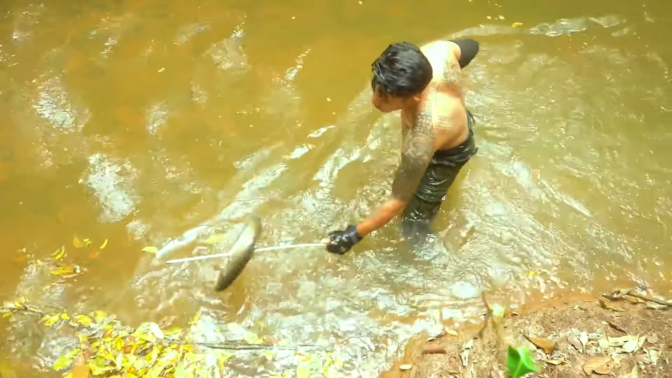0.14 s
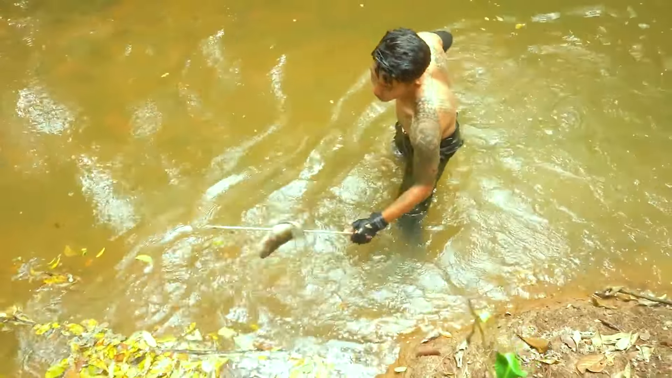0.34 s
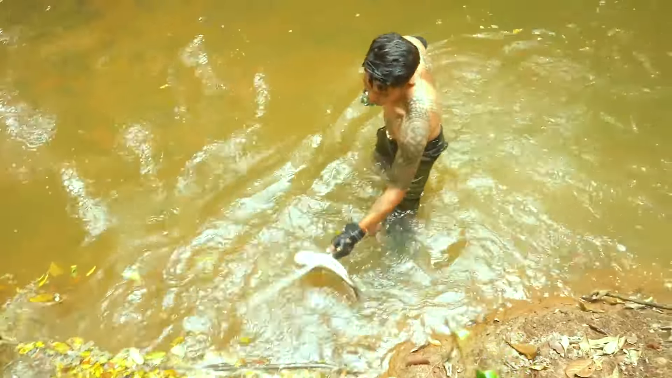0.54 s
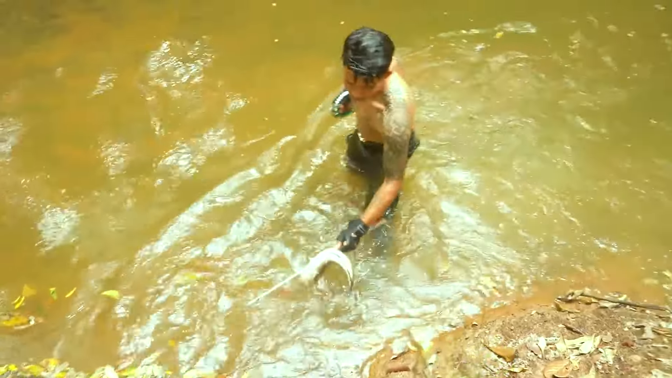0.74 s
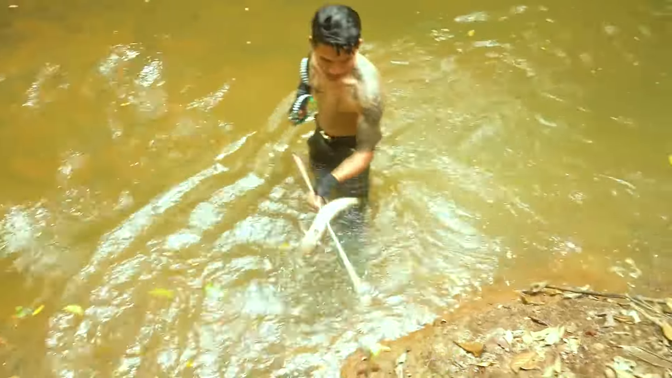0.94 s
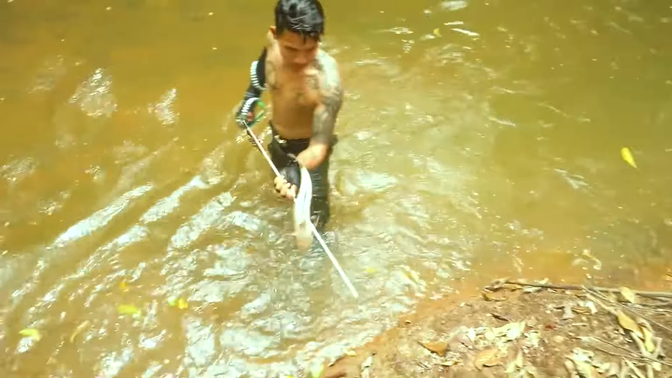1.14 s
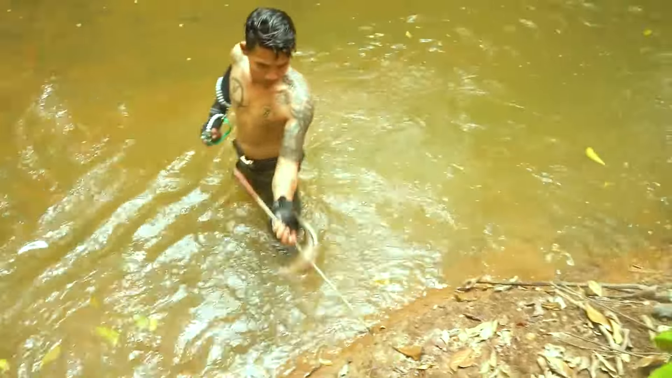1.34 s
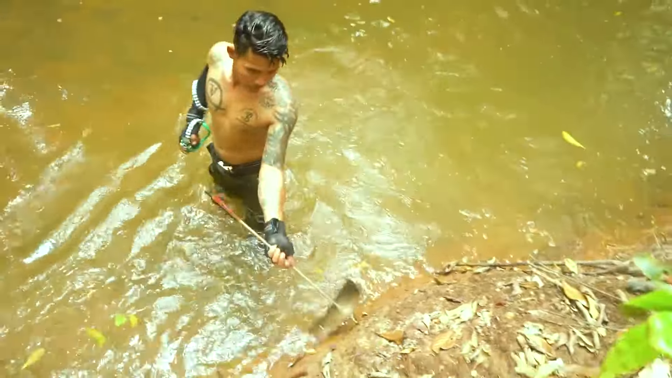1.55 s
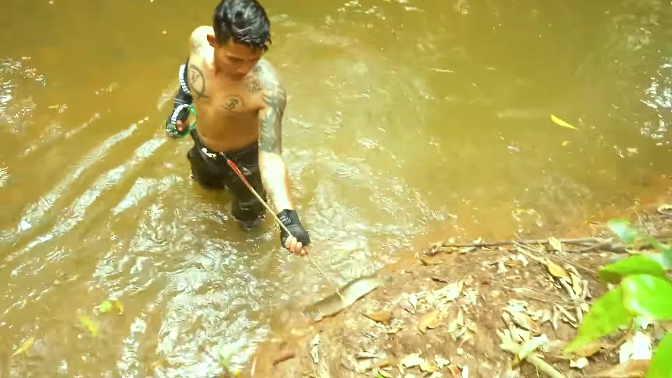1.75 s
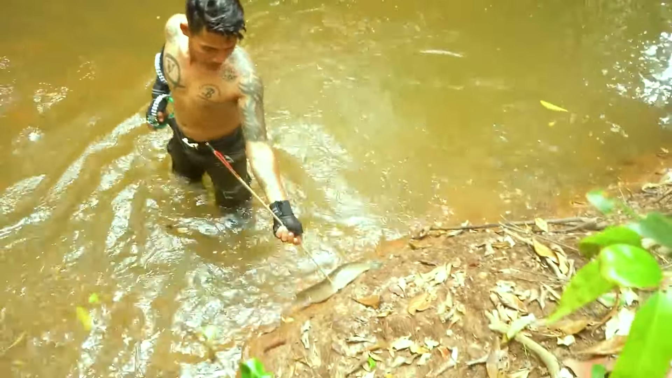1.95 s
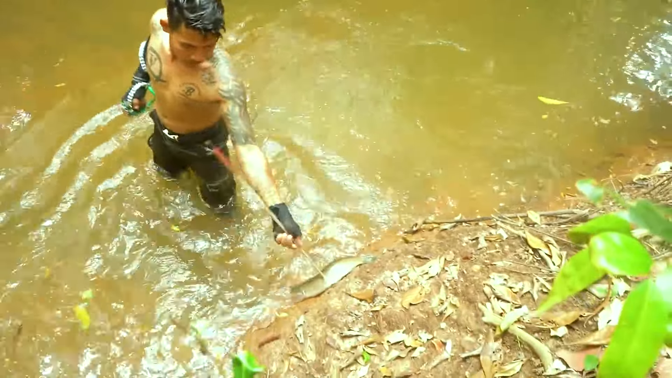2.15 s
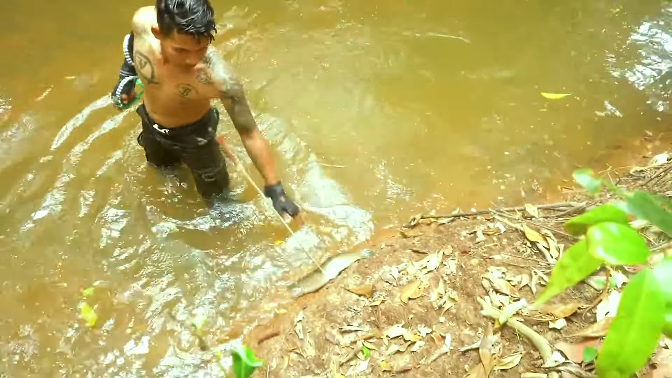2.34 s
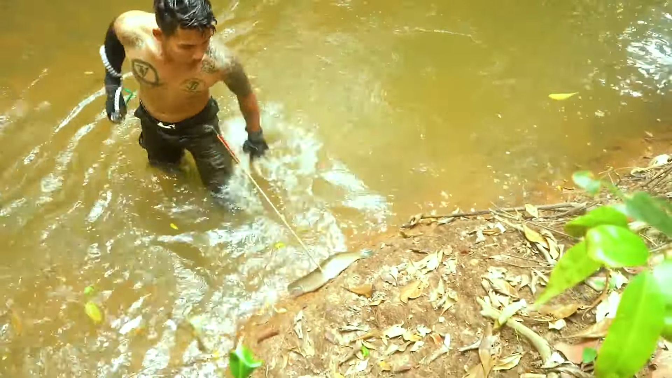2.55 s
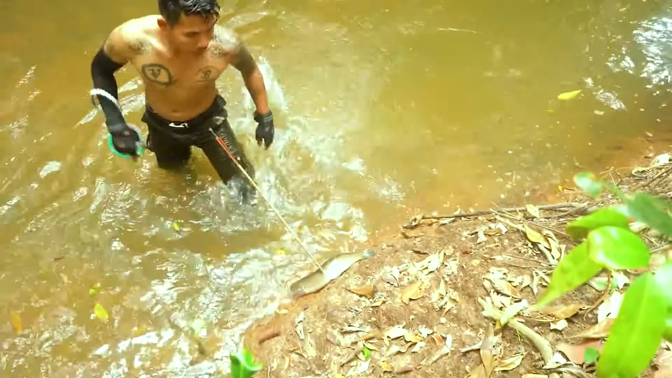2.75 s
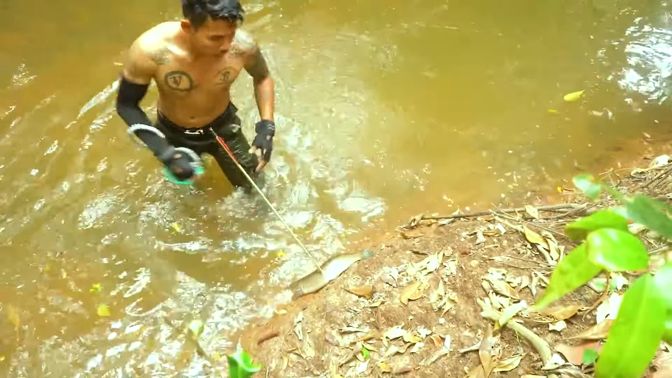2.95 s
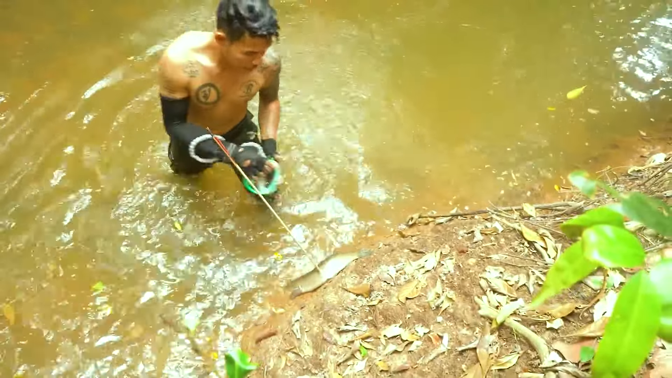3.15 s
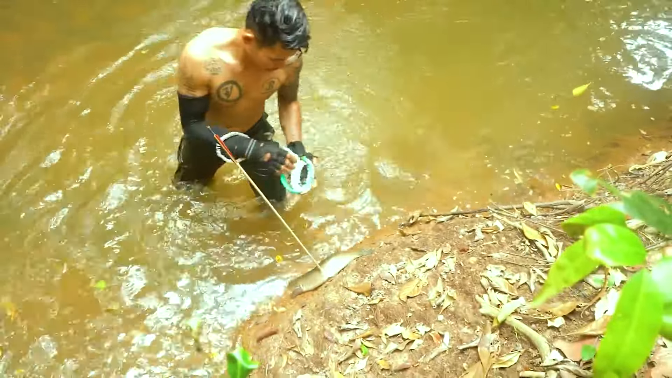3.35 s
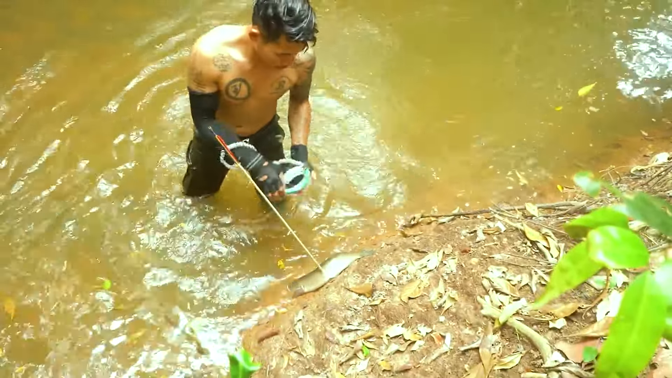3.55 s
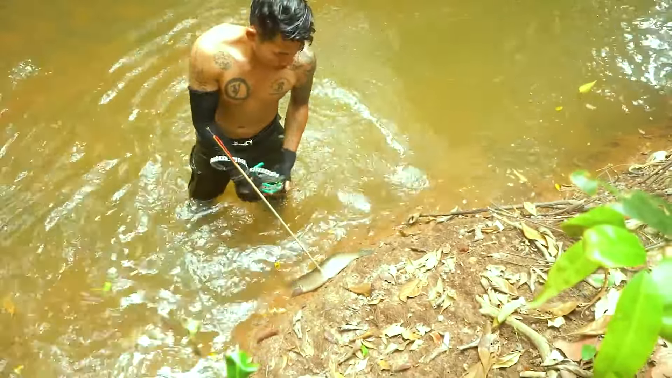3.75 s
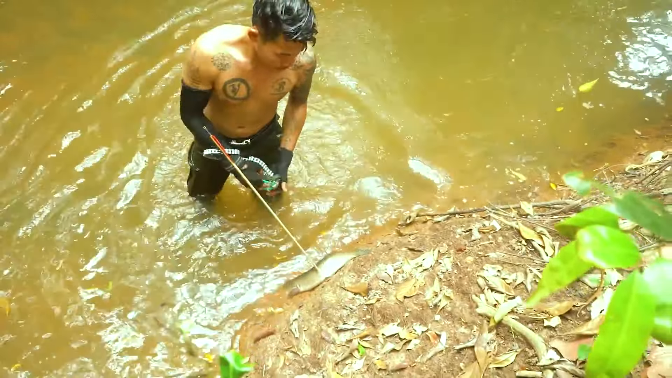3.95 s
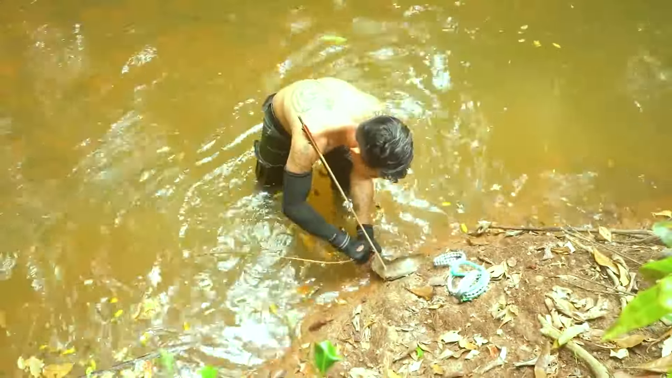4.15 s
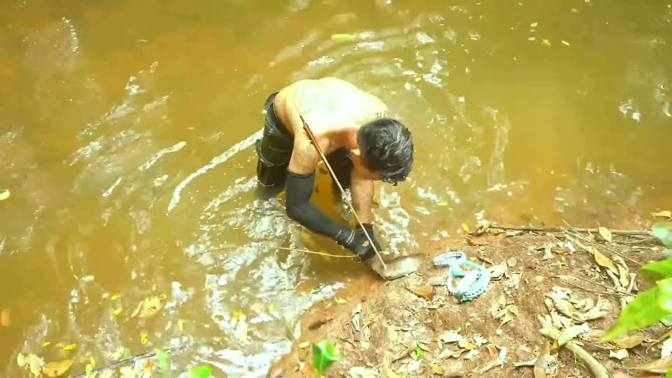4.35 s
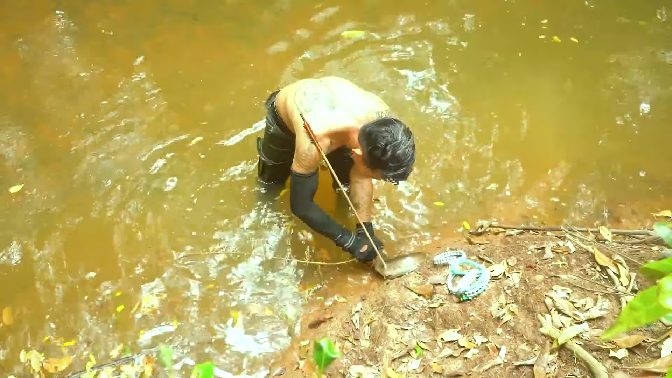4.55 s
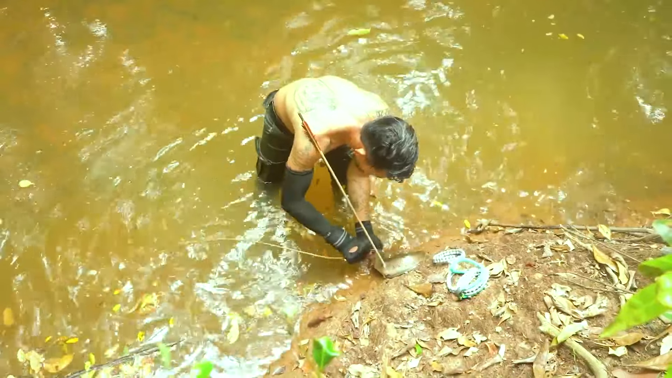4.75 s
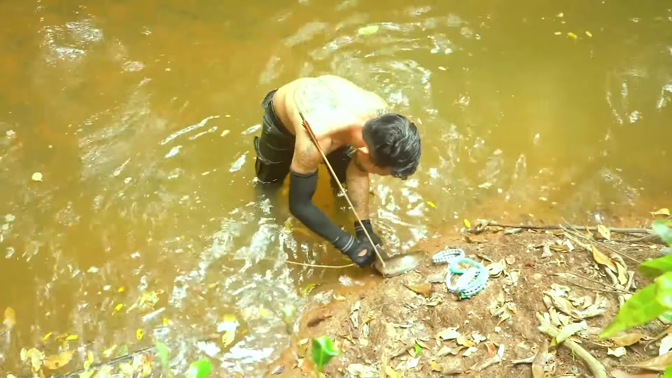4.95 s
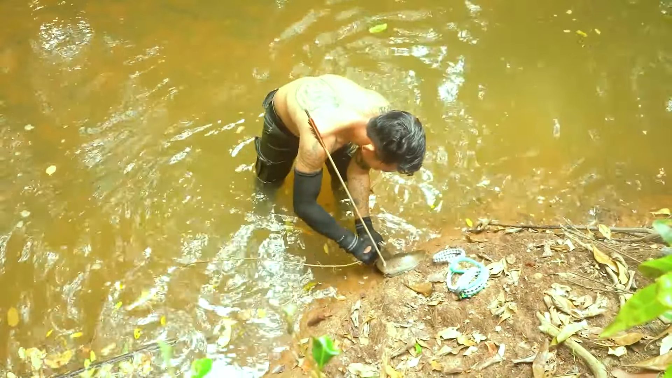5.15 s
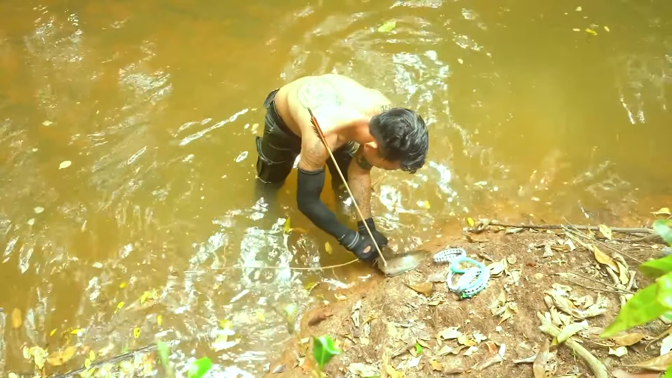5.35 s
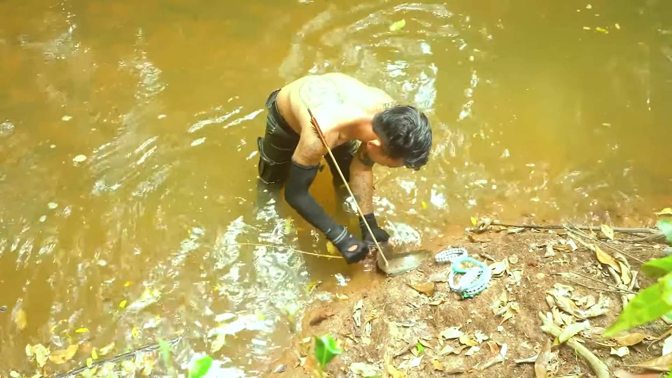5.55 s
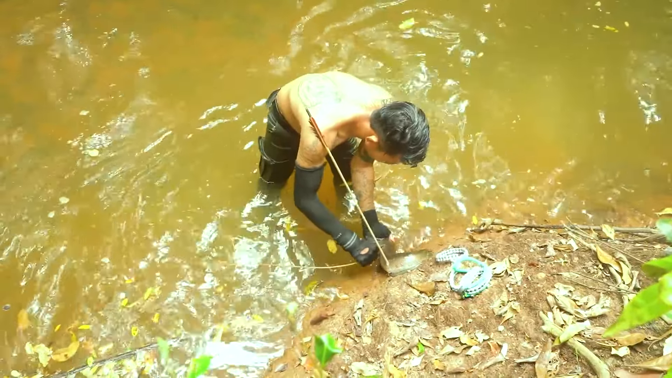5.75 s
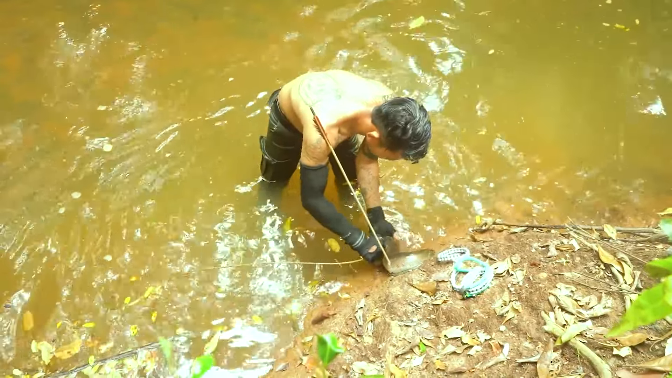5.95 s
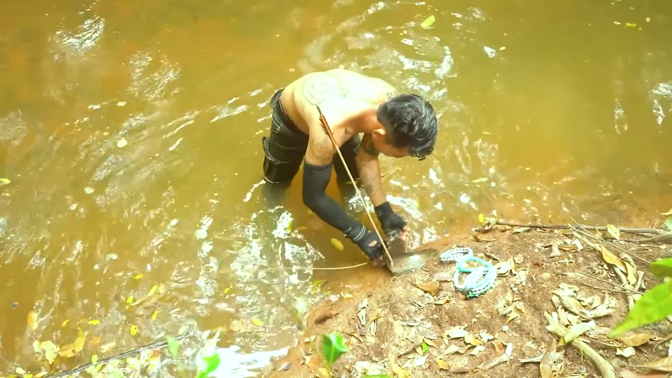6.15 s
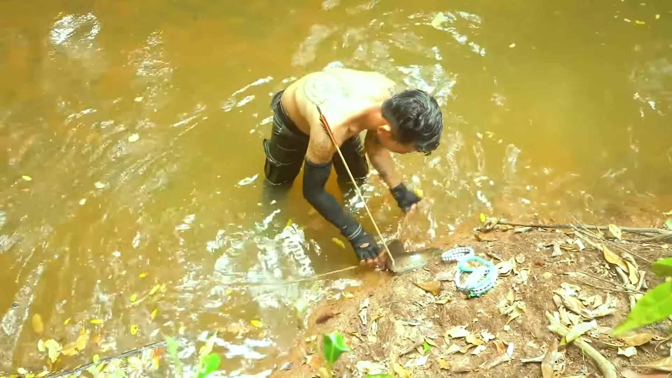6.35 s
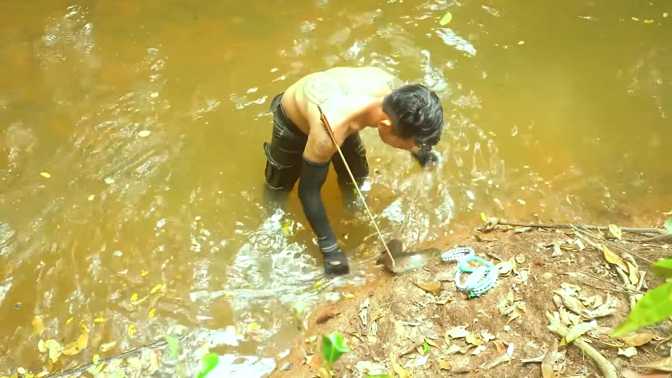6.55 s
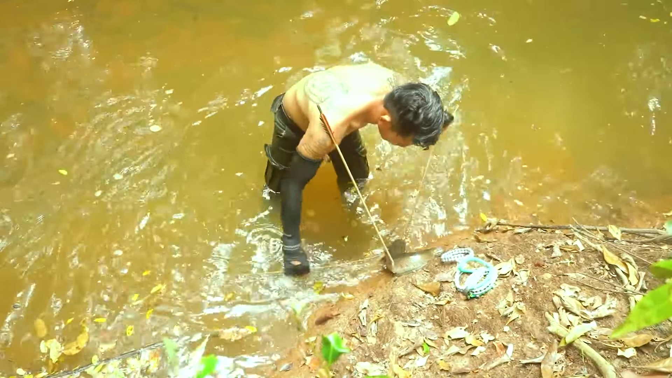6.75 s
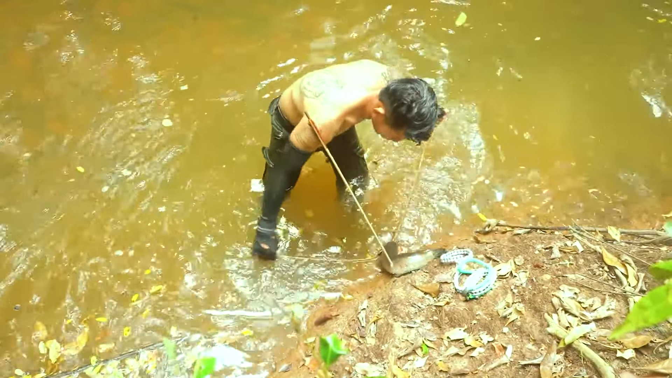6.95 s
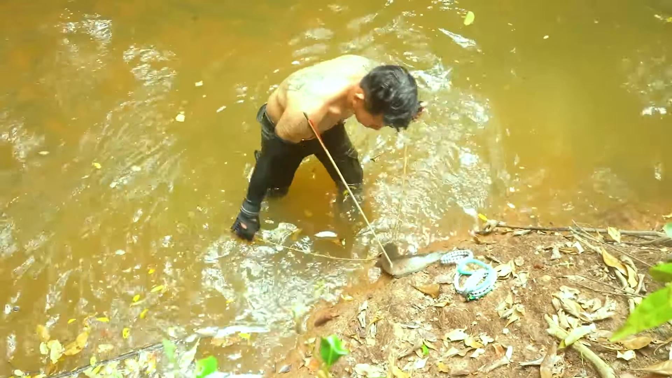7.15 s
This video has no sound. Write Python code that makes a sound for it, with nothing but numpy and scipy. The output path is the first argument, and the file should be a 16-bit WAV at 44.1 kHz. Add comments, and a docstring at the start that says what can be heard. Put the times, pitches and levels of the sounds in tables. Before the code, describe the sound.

Water churns and slaps around wading legs, settles to drips and soft forest hum with birds chirping, then scraping and fresh splashes return.

```python
"""A shallow forest stream with someone wading close by. Churned water is swarms of ringing bubbles under a rush
of hiss; single bubbles, slaps, thuds and gulps stand out of it. The forest hums as shaped noise, two birds are
wavering sines, and a thin rod scraped along the bank is random slips ringing moving resonances. Sound reaches
two microphone ports with small lags, and echoes follow the near sounds and the birds. The background is fuller
above the bass until 4.09 s, then steps down at once."""
import sys
import numpy as np
from scipy import signal
from scipy.fft import rfft, irfft, next_fast_len
from scipy.io import wavfile
from scipy.ndimage import uniform_filter1d

SR = 44100
rng = np.random.default_rng(int(sys.argv[2]) if len(sys.argv) > 2 else 0)


def put_to_file(sound):
    """Save the sound as 16-bit audio at rate SR, in the file named by the first command-line argument."""
    columns = np.atleast_2d(sound).T  # one column per channel
    safe = np.clip(columns, -1, 1)
    whole_steps = np.round(safe * 32767)
    wavfile.write(sys.argv[1], SR, whole_steps.astype(np.int16))


N = 317961  # samples
FFT_SIZE = next_fast_len(N + 8192)
FULLER_UNTIL_S = 4.09  # the background is fuller above the bass until here, then steps down at once


def amp(db):
    """Level to amplitude: 20 dB is a factor of ten."""
    return 10 ** (np.asarray(db) / 20)


def evened(x):
    """Normalization to a root-mean-square value of one."""
    return x / np.sqrt(np.mean(x ** 2) + 1e-20)


def read(points, hz):
    """Spectral interpolation: straight lines on a log-frequency axis."""
    f, value = np.transpose(points)
    return np.interp(np.log(hz + 1), np.log(f + 1), value)


def along(rows, t):
    """Linear interpolation in time of each column after the first."""
    s, *columns = np.transpose(rows)
    return [np.interp(t, s, column) for column in columns]


def add(mix, s, sound):
    """Superposition: a sound is summed into the mix from s seconds on."""
    part = mix[round(s * SR):][:len(sound)]
    part += sound[:len(part)]


def wander(length, size):
    """Random fluctuation: white noise smoothed by a running mean of size samples."""
    return evened(uniform_filter1d(rng.standard_normal(length), size=size))


def clicks(per_s, spread_db):
    """Random impulse train: independent arrivals, many small and a few large."""
    strength = amp(spread_db * np.minimum(rng.exponential(1, N), 5))
    return strength * (rng.random(N) < per_s / SR)


def bandpass(order, edges, x):
    """Band-pass filtering between two edges in Hz."""
    return signal.lfilter(*signal.butter(order, edges, "band", fs=SR), x)


def hiss(points, patchy_db, flicker_db, size):
    """Time-varying noise: two unrelated random short-time spectra share patches and flicker."""
    frames, hz = 4 * N // size + 5, np.fft.rfftfreq(size, 1 / SR)
    a, b, c, d, patches = rng.standard_normal((frames, len(hz), 5)).T
    patches = uniform_filter1d(patches, size=8, axis=0)
    patches = evened(uniform_filter1d(patches, size=8, axis=1))
    flicker = wander(frames, 6)
    level_db = read(points, hz)[:, None] + patchy_db * patches + flicker_db * flicker
    return hz, np.array([a + 1j * b, c + 1j * d]) * amp(level_db)


def pair(hz, z, likeness):
    """Partial coherence: two unrelated spectra mix to a left and right alike by the given share."""
    same = np.clip(read(likeness, hz), 0, 1)[:, None]
    return np.array([z[0], same * z[0] + np.sqrt(1 - same ** 2) * z[1]])


def heard(z, size):
    """Inverse short-time transform: overlapping frames add up to sound."""
    return evened(signal.istft(z, nperseg=size, noverlap=3 * size // 4)[1][..., :N])


def ports(x, lag_us):
    """Arrival-time difference: the right port hears the source lag_us microseconds after the left."""
    turn = np.exp(-1j * np.pi * np.fft.rfftfreq(FFT_SIZE, 1 / SR) * lag_us / 1e6)
    return irfft(rfft(x, FFT_SIZE) * [1 / turn, turn], FFT_SIZE)[:, :N]


def scatter(x, t60):
    """Reverberation: dense decaying echoes off banks and trunks, different at each port."""
    t = np.arange(int(t60 * SR)) / SR
    echoes = rng.standard_normal((2, len(t))) * amp(-60 * t / t60) * (t > .003)
    return signal.oaconvolve(x[None], echoes / np.linalg.norm(echoes[0]), axes=1)[:, :N]


def whistle(rows, wobble, flutter_db):
    """Frequency modulation: a sine follows a pitch curve, wavering in pitch and strength."""
    t = np.arange(rows[0][0], rows[-1][0], 1 / SR)
    hz, db = along(rows, t)
    waver, flutter = wander(len(t), 300), wander(len(t), 700)
    tone = np.sin(2 * np.pi * np.cumsum(hz * (1 + wobble * waver)) / SR)
    return t[0], np.sqrt(2) * amp(db + flutter_db * flutter) * tone * signal.windows.tukey(len(t), .25)


def bubble(hz, t60, climb=.05):
    """Volume pulsation: a sine holds, then dies fast as the bubble bursts; pitch climbs near the surface."""
    t = np.arange(int(t60 * SR) + 8) / SR
    decay = amp(-60 * (t / t60) ** 1.496)
    onset = 1 - np.exp(-t * hz * 2.41)
    return decay * onset * np.sin(2 * np.pi * hz * t * (1 + climb * t / t60))


def water_level(t):
    """Power addition: splashes swell and die by straight slopes in dB, over an even floor until 4.09 s."""
    # Splashes and surges. Each row: peak time in seconds, churn level in dB, seconds to rise 20 dB,
    # seconds to fall 20 dB, spray relative to churn in dB before the common spray lift.
    splashes = [(.04, -21, 5.54, 0.38, -9), (0.305, -27, 0.25, 0.2, -6.5), (.425, -30, 0.17, 0.2093, -4.5),
                (.47, -27.5, 0.2, 0.02, -10), (.655, -25, 0.014, 0.2, 1), (0.734, -22, 0.1, 0.0229, 1.5),
                (.775, -28, 0.0881, 0.18, 2.5), (.915, -33.5, 0.13, 0.6553, 1.3),
                (1.09, -35, 0.1, 0.265, -6), (1.694, -28.5, 0.0052, 0.0914, 4),
                (1.77, -33.5, 0.3827, 0.6544, -3.5), (2.076, -30.5, 0.07, 0.17, -8.5),
                (2.528, -27.5, 0.02, 0.3122, 6), (2.63, -23, 0.06, 0.06, -12),
                (2.745, -20, 0.1933, 0.45, -2.5), (2.95, -20.5, 0.32, 0.24, -7),
                (3.05, -30.5, 0.1493, 0.544, -3), (3.213, -27.5, 0.06, 0.32, -13.5),
                (6.26, -43, 0.06, 2.5, 4.5), (6.611, -25.5, 0.3377, 0.25, -11),
                (6.84, -29.5, 0.665, 0.22, -6.5), (6.99, -37.5, 0.21, 0.1, -2)]
    floor_db, floor_spray_db = -49.5, .5
    s, db, rise, fall, spray_db = np.transpose(splashes)[..., None]
    power = amp(db - 20 * np.maximum((s - t) / rise, (t - s) / fall)) ** 2
    floor = amp(floor_db - 60 * (t > FULLER_UNTIL_S)) ** 2
    churned = power.sum(0) + floor
    sprayed = (power * amp(spray_db) ** 2).sum(0) + floor * amp(floor_spray_db) ** 2
    return 10 * np.log10(churned), 10 * np.log10(sprayed / churned)


def treble_share(hz):
    """Spectral crossover: zero up to 2500 Hz, rising with log frequency to one at 6250 Hz."""
    return np.clip(np.log(hz / 2500 + 1e-9) / np.log(2.5), 0, 1)


def bubble_swarms(spectrum, spray_db):
    """Many pulsating bubbles of all sizes, over patches of water; the small ones follow the spray."""
    # Patches of water. Each entry: lag of the right port in microseconds.
    patch_lags = [-25, 0, 12, 30]
    patches = np.zeros((len(patch_lags), N))
    pitches = np.geomspace(380, 12000, num=40)
    for k, (hz, share) in enumerate(zip(pitches, treble_share(pitches))):
        grain = bubble(hz, 40 / hz * rng.uniform(.5, 1.5), rng.uniform(0, .25))
        swarm = evened(signal.oaconvolve(clicks(27 * (hz / 400), 3.8), grain)[:N])
        level = amp(read(spectrum, hz) + share * (spray_db - 6.0))
        patches[k % len(patch_lags)] += level * np.sqrt(hz) * swarm  # root: bands widen with pitch
    swarms = evened(sum(ports(patch, lag) for patch, lag in zip(patches, patch_lags)))
    clumps = evened(uniform_filter1d(wander(N, 1200), size=1200))
    return evened(amp(2.45 * clumps) * swarms)


def spray_rush(spectrum, spray_db):
    """Broadband noise: a rush of spray whose treble follows the spray level."""
    # Coherence of the spray. Each row: frequency in Hz, left-right likeness as a share.
    spray_likeness = [(1000, 1), (3000, 0.046), (12000, 0.24)]
    hz, z = hiss(spectrum, patchy_db=2.5, flicker_db=3.5, size=256)
    share = treble_share(hz)[:, None]
    frame_spray_db = spray_db[np.minimum(np.arange(z.shape[2]) * 64, N - 1)]
    z = z * amp(share * frame_spray_db - 6 * (1 - share))
    return amp([[-1.8], [-0.6]]) * heard(pair(hz, z, spray_likeness), size=256)


def churn(spray_db):
    """Superposed bubble ringing and spray noise share one spectrum of churned water."""
    # Spectrum of churned water. Each row: frequency in Hz, relative density in dB per Hz.
    spectrum = [(120, -35.5), (300, -24), (640, -2), (900, -6.5), (1300, -1.5), (2000, -3.5), (6400, -15),
                (15600, -25.5)]
    return bubble_swarms(spectrum, spray_db) + spray_rush(spectrum, spray_db)


def gulps(out):
    """Cavity resonance: a leg drags air under, and the pocket's pitch rises as it shrinks and closes."""
    # Air pockets. Each row: start in seconds, length in seconds, first pitch in Hz, last pitch in Hz,
    # level in dB at the end of the rise, before flutter.
    air_pockets = [(0.0, 0.16, 250.9, 422, -26.5), (2.826, 0.05325, 449.5, 484, -27.5),
                   (2.957, 0.136, 229.1, 272, -30), (6.58, .08, 335, 365, -42), (6.73, .08, 315, 365, -38)]
    rise_s, start_db, fade_db = .01642, -9, -8.5
    for s, length, first, last, db in air_pockets:
        rows = [(s, first, db + start_db), (s + rise_s, first, db), (s + length, last, db + fade_db)]
        add(out, *whistle(rows, wobble=.07, flutter_db=5))


def single_bubbles(out):
    """Volume pulsation of the bubbles that stand out one by one."""
    # Each row: start in seconds, level in dB, pitch in Hz, 60 dB decay time in seconds and, where it is
    # not the usual, climb as a share of pitch by mid-ring.
    rings = [(.029, -13, 690.8, .0205), (.042, -12, 1350, .035, .2), (.078, -15, 1400, .02),
             (.094, -17.5, 560, .052, .18), (.119, -14, 3250, .012), (.171, -18, 1880, .02),
             (.308, -17.5, 1500, .025), (.338, -11, 6336, .0076), (.422, -19.5, 1372, .04),
             (.579, -26, 681.9, .019), (.629, -24, 1600, .04), (.642, -12.5, 1842, .012),
             (.649, -7.5, 1100, .02), (.77, -15, 2463, .017), (.784, -23.5, 749.5, .029),
             (.801, -20.5, 740, .037), (.848, -17, 2710, .012), (.865, -21, 3400, .018, .15),
             (.91, -20, 1444, .029, .135), (.938, -19, 2348, .012), (.971, -20, 1600, .01),
             (1.015, -28, 578, .065), (1.058, -25, 3050, .016), (1.074, -19, 2830, .013),
             (1.078, -22, 732.2, .024), (1.364, -19, 1960, .022), (1.411, -23.5, 5186, .009),
             (1.471, -24, 1645, .015, .25), (1.879, -28, 511, .054), (2.066, -21, 1400, .01),
             (2.073, -22, 1800, .019), (2.085, -27.5, 633, .057, .205), (2.317, -26.5, 5263, .011),
             (2.368, -26, 1346, .046), (2.521, -13.5, 1940, .012), (2.648, -17.5, 581, .077),
             (2.756, -11, 6065, .012), (2.779, -9.5, 1863, .023), (2.834, -12.5, 1840, .03, .134),
             (2.931, -14, 627.7, .046), (2.957, -15, 645, .0275), (3.086, -19, 660, .029),
             (3.211, -15, 1123, .025, .11), (3.224, -16.5, 614, .054), (3.446, -27, 1350, .035),
             (3.498, -26, 1153, .07, .4), (3.586, -22, 651, .085, .26), (3.607, -22, 1811, .026, .265),
             (3.667, -27, 1150, .014), (3.675, -24, 1300, .015, .2), (3.718, -29, 1345, .034),
             (3.849, -27, 1000, .008), (3.895, -19, 1603, .032, .084), (3.912, -29, 3873, .014),
             (4.323, -39, 2250, .02), (6.075, -13.5, 1242, .036, .014), (6.109, -21, 547.5, .028),
             (6.317, -21.5, 640, .025), (6.402, -18.5, 2299, .021), (6.493, -19, 703, .034),
             (6.508, -14, 1559, .013), (6.528, -20, 617.1, .037), (6.585, -12.5, 1036, .025),
             (6.782, -15, 1693, .018), (6.831, -9.5, 2004, .013), (6.861, -17.5, 1171, .021, .27),
             (6.971, -24, 715.2, .057), (7.117, -25, 3278, .014), (7.194, -24.5, 620.4, .065)]
    for s, db, *ring in rings:
        add(out, s, amp(db) * bubble(*ring))


def slaps(out):
    """Band noise with a short crack and a longer tail: impacts as slaps of water, and one bare tick at 4.07 s
    shaped the same way."""
    # Each row: start in seconds, level in dB before the crack and tail offsets, centre in Hz.
    impacts = [(.058, -5.5, 3494), (.642, -17, 3000), (0.696, -13, 4020), (.803, -16, 5000),
               (.777, -8.5, 4950), (1.468, -17, 3800), (1.508, -25, 11000), (1.519, -21, 9000),
               (1.679, -12.5, 6920), (1.692, -3.5, 3360), (1.767, -10, 3878), (3.019, -13, 5957),
               (3.279, -17, 5955), (3.874, -26, 5000), (4.0705, -22, 7900), (4.963, -35, 7000),
               (6.108, -26.5, 3500), (6.832, -14.5, 4200), (7.05, -20, 7000)]
    span = 1.8  # the band reaches this factor above and below its centre
    t = np.arange(4000) / SR
    for s, db, hz in impacts:
        edges = [hz / span, min(hz * span, SR / 2 - 1000)]
        burst = evened(bandpass(2, edges, rng.standard_normal(len(t))))
        crack = amp(db - 10.5 - 60 * t / .014)
        tail = amp(db - 18.5 - 60 * t / .13)
        add(out, s, (crack + tail) * burst)


def thuds(out):
    """Damped oscillation: dull blows on the bank, each dying over the same number of cycles."""
    # Each row: start in seconds, level in dB before a 4 dB lift, pitch in Hz.
    blows = [(1.769, -20, 257), (1.782, -12.5, 810), (3.541, -27.5, 233)]
    t = np.arange(4000) / SR
    for s, db, hz in blows:
        add(out, s, amp(db + 4.0 - 60 * t * hz / 4.63) * np.sin(2 * np.pi * hz * t))


def drops():
    """Superposition of the gulps, single bubbles, slaps and thuds."""
    out = np.zeros(N)
    for source in (gulps, single_bubbles, slaps, thuds):
        source(out)
    return out


def forest():
    """Diffuse noise of far leaves, water and wind: ports agree in the bass; fuller above it until 4.09 s."""
    # Spectrum of the hum. Each row: frequency in Hz, relative density in dB per Hz.
    hum = [(18, -26), (42, -1.5), (90, -7.5), (226, -10.5), (583, -17), (1020, -18.5), (1270, -19.5),
           (15600, -32.5)]
    # Coherence of the hum. Each row: frequency in Hz, left-right likeness as a share.
    hum_likeness = [(60, 1), (300, 0.91), (1500, 0.0143)]
    hz, z = hiss(hum, patchy_db=1.2, flicker_db=.2, size=1024)
    early = np.arange(z.shape[2]) * 256 / SR < FULLER_UNTIL_S
    early_db = read([(90, 0.21), (180, 5.7), (2000, 3.6)], hz)  # (Hz, dB)
    z = z * amp(early_db[:, None] * early)
    return amp(-42.5) * heard(pair(hz, z, hum_likeness), size=1024)


def near_bird(dry):
    """Frequency glides: thin, husky notes from the trees bend smoothly through three pitches."""
    # Each row: start in seconds, length in seconds, first, middle and last pitch in Hz,
    # level in dB before flutter and the direct and echo gains.
    notes = [(1.875, .1, 10400, 10500, 10550, -52), (2.13, 0.057, 5800, 4150, 3780, -47),
             (4.094, 0.068, 4877, 4904, 4900, -44), (4.205, 0.065, 5400, 5810, 6150, -51.5),
             (4.248, 0.0611, 6130, 6200, 6250, -52), (4.256, 0.084, 5700, 3850, 3250, -44),
             (4.426, 0.1206, 5576, 5960, 6620, -49.5), (4.53, 0.08862, 6650, 6317, 5746, -47.5),
             (4.597, 0.042, 5961, 5077, 4206, -48), (4.555, 0.134, 2903, 3130, 3370, -52.5),
             (4.654, 0.068, 3289, 3803, 3755, -50.5)]
    for s, length, first, middle, last, db in notes:
        u = np.linspace(0, 1, num=9)
        hz = np.polyval(np.polyfit([0, .5, 1], [first, middle, last], deg=2), u)
        rows = np.c_[s + u * length, hz, np.full_like(u, db)]
        add(dry, *whistle(rows, wobble=.022, flutter_db=3.5))


def far_bird(dry):
    """Frequency glides: a duller, far bird's sinking phrase, each note sagging in pitch."""
    # Each row: start in seconds, length in seconds, starting pitch in Hz,
    # level in dB before flutter and the direct and echo gains.
    phrase = [(5.254, 0.075, 2341, -52), (5.334, 0.09, 2340, -54.5), (5.472, 0.0504, 2330, -55.5),
              (5.548, 0.025, 2190, -53), (5.627, 0.04, 2080, -54), (5.718, 0.028, 2199, -49.5)]
    sag = .02751  # share of its pitch by which a note sinks
    for s, length, hz, db in phrase:
        rows = [(s, hz, db), (s + length, hz * (1 - sag), db)]
        add(dry, *whistle(rows, wobble=.035, flutter_db=4.5))


def birds():
    """Direct and reverberant sound of both birds."""
    dry = np.zeros(N)
    near_bird(dry)
    far_bird(dry)
    return amp(-5) * dry + amp(-2) * scatter(dry, .2)


def grip(t):
    """Power envelopes: each scrape swells and fades in one arch; the grip decides which modes are free."""
    # Scrapes. Each row: start in seconds, length in seconds, then arch-top levels in dB of the
    # low ring, middle ring, high ring and rasp.
    strokes = [(5.328, 0.068, -51, -43, -68, -71.5), (5.762, 0.08085, -52, -53, -55, -49),
               (5.879, 0.11343, -51, -53.5, -52.5, -54), (6.1, 0.17, -44, -63, -52.5, -80.5),
               (6.21, 0.26, -39, -52, -48, -48), (6.41, 0.33, -36, -42, -38, -50.5),
               (6.6, .42, -46, -38, -46, -50)]
    s, length, *levels = np.transpose(strokes)[..., None]
    arch = np.sin(np.pi * np.clip((t - s) / length, 0, 1))
    return [10 * np.log10((arch * amp(db) ** 2).sum(0) + 1e-12) for db in levels]


def resonate(x, hz, width):
    """Heterodyning: shift the curve hz down to zero, smooth and shift back, for a moving resonance."""
    turn, r = np.exp(2j * np.pi * np.cumsum(hz) / SR), np.exp(-np.pi * width / SR)
    return evened((turn * signal.lfilter([1 - r], [1, -r], x / turn)).real)


def rod(t):
    """Stick-slip excitation: uneven slips ring the modes of the rod over a dry rasp."""
    # Main modes. Each row: frequency in Hz before flexing, half the width in Hz of each of two
    # resonances in series.
    modes = [(700, 80), (1580, 204), (2300, 120)]
    # Flexing of the rod. Each row: time in seconds, pitch factor of the main modes.
    flexing = [(6.12, 1.04), (6.26, .94), (6.38, 1.04), (6.64, .92), (7, 1)]
    # Upper modes. Each entry: frequency in Hz before flexing.
    upper_modes = [3950, 5000, 5700]
    *rings_db, rasp_db = grip(t)
    bend = along(flexing, t)[0]
    slips = clicks(4000, 1.6) * rng.standard_normal(N)
    rasp = evened(bandpass(3, [1800, 4800], slips))
    out = amp(rasp_db) * rasp
    upper = sum(resonate(rasp, hz * np.sqrt(bend), 140) for hz in upper_modes)
    out += amp(rings_db[0] - 9) * upper  # each mode 9 dB under the low ring
    for (hz, width), db in zip(modes, rings_db):
        chatter = wander(N, 900)
        ring = resonate(slips, hz * bend, 2 * width)
        out += amp(db + 2.2 * chatter) * resonate(ring, hz * bend, 2 * width)
    return ports(out, -20)


def scene():
    """Superposition of near water and rod, their echoes, the birds and the forest."""
    # Where the wader stands. Each row: time in seconds, left over right in dB.
    side_of = [(0, 0.14), (3.7, 0.4), (6, -1), (7.2, -3)]
    t = np.arange(N) / SR
    churn_db, spray_db = water_level(t)
    near = amp(churn_db) * churn(spray_db + 8.3)
    near += ports(drops(), 8)
    near += rod(t)
    bright = signal.lfilter(*signal.butter(1, 1500, "high", fs=SR), near.mean(0))  # long waves reach both ports alike
    side_db = along(side_of, t)[0] / 2
    echoes = amp(-8.0) * scatter(bright, .12)
    return near * amp([side_db, -side_db]) + echoes + forest() + birds()


def record(dry):
    """Linear filtering: a bass cut at 30 Hz and a band limit at 15720 Hz."""
    cut = signal.lfilter(*signal.butter(2, 30, "high", fs=SR), dry)
    band_limit = signal.firwin(511, 15720, window=("kaiser", 9), fs=SR)
    return signal.oaconvolve(cut, band_limit[None], "same")


dry = scene()
out = record(dry)
put_to_file(out)
```